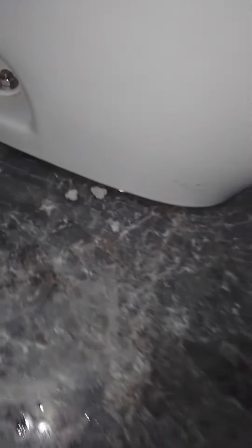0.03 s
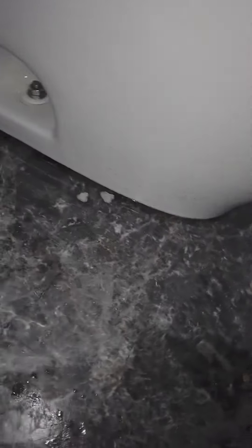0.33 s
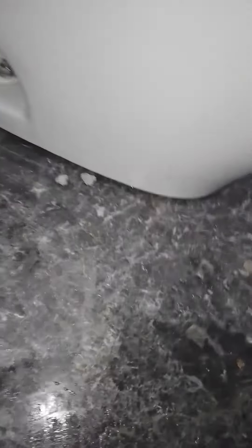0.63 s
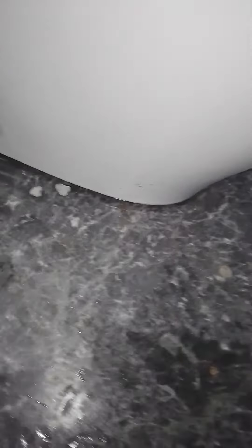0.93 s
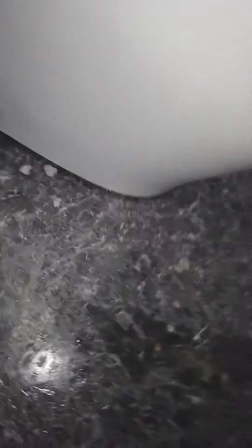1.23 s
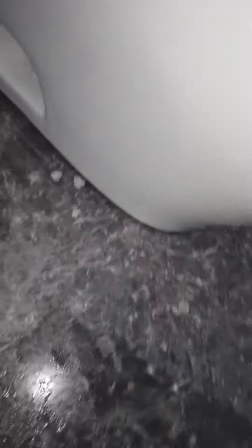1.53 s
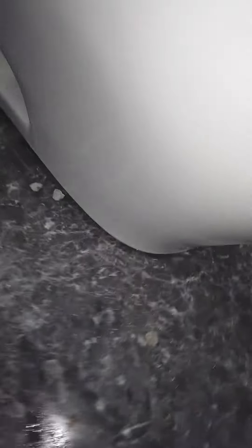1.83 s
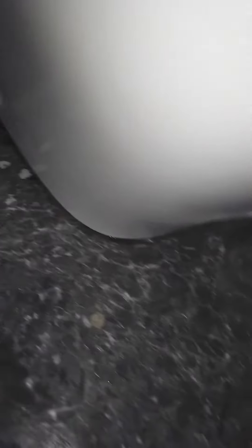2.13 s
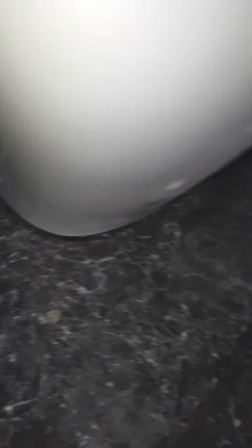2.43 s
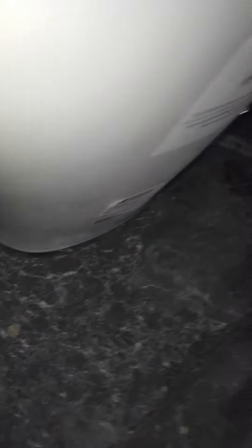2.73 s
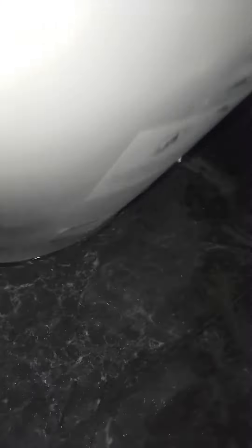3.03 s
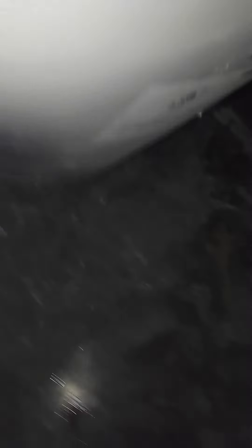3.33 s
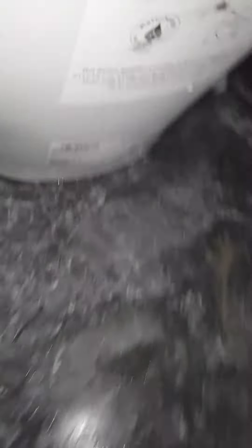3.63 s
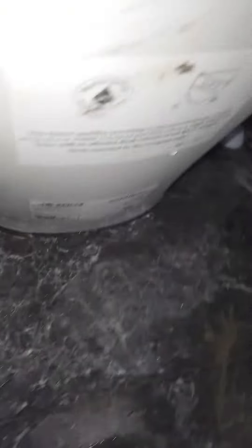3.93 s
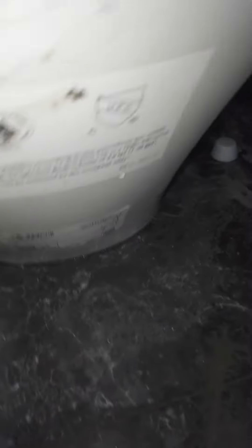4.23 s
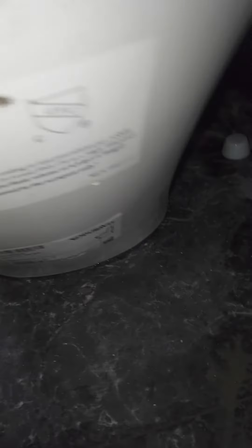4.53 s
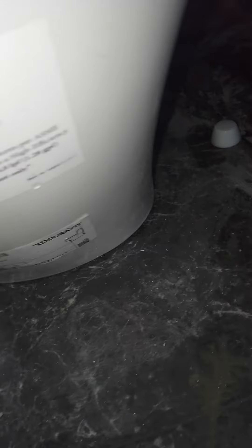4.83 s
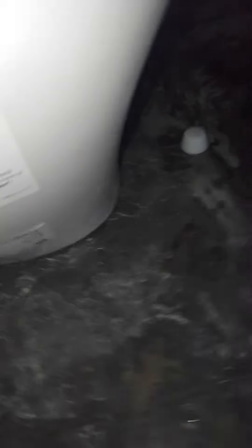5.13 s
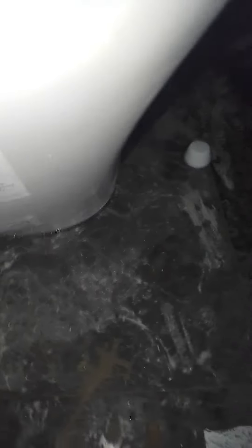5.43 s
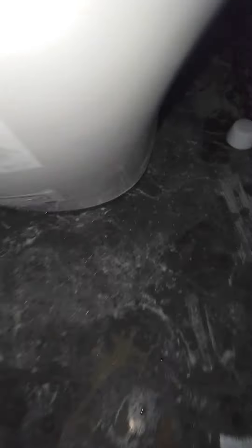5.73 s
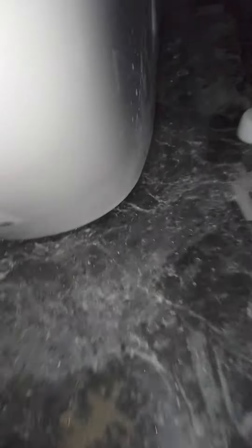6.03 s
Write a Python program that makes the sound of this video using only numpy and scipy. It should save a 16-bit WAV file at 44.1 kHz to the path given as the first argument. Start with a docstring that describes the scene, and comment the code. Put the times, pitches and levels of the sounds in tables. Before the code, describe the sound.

Water sprays and spatters in uneven surges on a tiled floor around a toilet, with ticking drops, plops and light gurgling.

```python
"""A small tiled room, one microphone close to the floor, where water spatters around the base of a toilet.
It opens on a thin fizz of spray and single ticking drops; before the first second is out, something hard
rings twice. Then the flow comes in uneven surges: gushes slap down, bigger drops patter or plop, and the
pooled water sloshes and gurgles. A sharp gush lands near 3.5 s, the flow thins, and the hardest plops
follow after 5.5 s. The room hums faintly throughout."""
import sys
import numpy as np
from scipy import signal
from scipy.fft import rfft, irfft
from scipy.io import wavfile
from scipy.ndimage import uniform_filter1d

SR = 44100
rng = np.random.default_rng(int(sys.argv[2]) if len(sys.argv) > 2 else 0)


def bounce(signal):
    """Save signal as a 16-bit WAV file at the path given by the first command-line argument."""
    frames = np.transpose(np.atleast_2d(signal))
    limited = np.clip(frames, -1, 1)
    pcm = np.round(limited * 32767).astype(np.int16)
    wavfile.write(sys.argv[1], SR, pcm)


N = 269003
TIME = np.arange(N) / SR

# The spray sounds higher when it is finer. Each row: time in seconds, pitch in Hz.
SPRAY_PITCH = [(0.0, 10300), (0.56, 10000), (0.9, 9200), (1.14, 10800), (1.26, 9700), (1.72, 10600),
               (3.06, 9530), (3.75, 11300), (4.11, 9650), (4.3, 10430), (4.38, 8900), (4.91, 10300),
               (4.97, 12000), (5.05, 11700), (5.1, 9800), (5.76, 11200), (5.83, 10100), (6.1, 9640)]


def running_water():
    """The uneven flow on the floor; lone droplets crackle out of it, most plainly when it is thin."""
    spray_db, patter_db, slosh_db, slosh_hz = flow()
    thinness = from_db(-.15 * np.maximum(spray_db + 50, 0))
    crackle = thinness * impacts(per_s=240, spread_db=3.6, clump_db=1.0)
    fine = impacts(per_s=9000, spread_db=1.9, clump_db=1.7) + from_db(-7) * crackle
    coarse = impacts(per_s=8000, spread_db=2, clump_db=1.57) + from_db(-16.5) * crackle
    deep = impacts(per_s=3000, spread_db=3, clump_db=1.0)
    spray_hz = np.interp(TIME, *np.transpose(SPRAY_PITCH))
    return water([fine, coarse, deep], spray_hz, spray_db, patter_db, slosh_db, slosh_hz)


def flow():
    """Stream and surges add in power: spray, patter and slosh in dB, then the puddle's pitch in Hz."""
    # The stream under the surges. Each row: time in seconds, then spray, patter and slosh in dB before trim.
    stream = [(0.0, -45, -59, -61), (0.32, -40, -46, -55.5), (0.8, -44.5, -54, -63.5),
              (1.6, -32.5, -41, -45), (1.75, -28.5, -37, -35.5), (1.88, -31.5, -42, -41.5),
              (2.6, -46.5, -65.5, -59), (2.85, -53, -71, -63.5), (2.99, -71, -60, -79),
              (3.36, -33.5, -49, -67), (3.57, -51, -45, -59), (3.87, -27, -39, -36),
              (4.2, -52.5, -87, -68.5), (4.91, -58.5, -91, -59), (5.06, -53, -45, -61),
              (5.43, -57, -57, -58.5), (5.54, -37, -53, -55), (5.71, -48, -52, -55), (6.1, -34, -36, -60)]
    # Each row: start, rise and hold in seconds, spray, patter and slosh in dB, slosh pitch in Hz.
    surges = [(0.08, 0.057, 0.017, -41.5, -43.5, -56, 1500), (0.25, 0.087, .01, -38.5, -41, -65, 1500),
              (0.712, 0.003, 0.043, -36.5, -47.5, -41.5, 1060), (1.076, 0.021, 0.081, -43, -41, -46.5, 580),
              (1.541, 0.037, .015, -30, -50, -48, 1410), (1.67, 0.026, 0.089, -45, -56, -42, 1280),
              (1.937, 0.082, 0.06, -33, -43, -49.5, 980), (2.323, 0.023, 0.059, -41, -45, -49.5, 1590),
              (2.785, 0.074, 0.015, -45.5, -59, -44.5, 1240), (2.895, 0.11, 0.027, -31.5, -37, -50, 680),
              (3.47, 0.03, 0.065, -39, -39.5, -47, 580), (3.573, 0.091, 0.089, -32.5, -39, -62, 600),
              (3.774, 0.17, 0.032, -33.5, -43.5, -58, 1240), (3.995, 0.031, 0.0086, -39, -41.5, -50, 830),
              (4.362, 0.035, .005, -42.5, -53, -62, 1300), (4.416, 0.034, 0.091, -47.5, -48.5, -50.5, 1270),
              (4.784, 0.034, 0.043, -58, -77, -46, 950), (4.828, 0.052, 0.023, -45, -62, -43, 1380),
              (4.916, 0.06, 0.07, -35.5, -49.5, -58, 1200), (5.116, 0.034, 0.036, -36, -38.5, -47.5, 1430),
              (5.502, 0.041, 0.015, -40, -38, -38.5, 846), (5.838, 0.041, 0.19, -30, -33.5, -44.5, 714)]
    trims_db, puddle_hz = (-7, -2, -4), 1140
    times, *stream_db = np.transpose(stream)
    power = np.array([from_db(np.interp(TIME, times, db) + trim) ** 2
                      for db, trim in zip(stream_db, trims_db)])
    weighted_hz = puddle_hz * power[2]   # the strongest slosh has most say in the pitch
    for start, rise, hold, *levels_db, slosh_hz in surges:
        span = slice(int(start * SR), int(start * SR) + SR)
        swell = envelope(TIME[span] - start, rise, hold, t60=0.43)
        surge_power = np.outer(from_db(levels_db), swell) ** 2
        power[:, span] += surge_power
        weighted_hz[span] += slosh_hz * surge_power[2]
    return (*(10 * np.log10(power)), weighted_hz / power[2])


def water(rain, spray_hz, spray_db, patter_db, slosh_db, slosh_hz):
    """Three streams of impacts sound as fine spray, patter on the tile and slosh in the puddle."""
    # Each row of these two: multiple of the pitch, relative level in dB.
    spray_spectrum = [(.125, -63), (.5, -31), (.75, -6.5), (.92, 1.1), (1.08, 2), (1.28, -3.5), (1.75, -15)]
    slosh_spectrum = [(.25, -48), (.5, -14.5), (.71, -9), (.95, -3), (1.5, 1), (2.83, -6.5), (5, -14.5),
                      (16, -61)]
    # Each row: frequency in Hz, relative level in dB.
    patter_spectrum = [(100, -5), (600, -28), (1500, -5), (3300, -2), (5200, 1.5), (6500, -0.5),
                       (10000, -6.5), (16000, -11.5)]
    fine, coarse, deep = rain
    spray = from_db(spray_db) * colour(fine, spray_spectrum, spray_hz)
    patter = from_db(patter_db) * colour(coarse, patter_spectrum)
    slosh = from_db(slosh_db) * colour(deep, slosh_spectrum, slosh_hz)
    return spray + patter + slosh


def impacts(per_s, spread_db, clump_db):
    """Droplets land at random, in clumps, some bigger than the rest; rms 1."""
    sizes = from_db(spread_db * np.minimum(rng.exponential(1, N), 4)) * rng.choice([-1, 1], N)
    lands = rng.random(N) < per_s / SR
    return rms_one(lands * sizes * from_db(clump_db * drift(per_s=150)))


def gushes():
    """Each gush slaps down as a dense burst of impacts that swells, holds and dies away."""
    # Each row: start, rise and hold in seconds, spray, patter and slosh in dB, slosh pitch in Hz.
    bursts = [(0.069, 0.0041, 0.039, -38.5, -50, -62, 900),
              (1.098, 0.021, 0.0046, -31.5, -30.5, -39.5, 1040),
              (1.133, 0.0088, 0.027, -28.5, -39, -46, 785), (1.266, 0.0027, 0.015, -36.5, -49, -55, 610),
              (1.319, 0.0013, 0.017, -30.5, -33, -46.5, 700), (1.569, 0.014, 0.011, -29, -33, -34, 1480),
              (1.57, 0.059, 0.023, -47, -37, -33, 1270), (2.343, 0.0033, 0.012, -33, -39.5, -51, 1840),
              (2.999, 0.0032, 0.0037, -41, -30, -38.5, 553), (3.325, 0.0034, 0.018, -31, -39.5, -70, 940),
              (3.348, 0.0087, 0.025, -31, -35.5, -45, 706), (3.467, .001, 0.029, -23, -24, -35.5, 620),
              (3.474, 0.0077, 0.0076, -13.5, -23, -34, 636), (4.363, .002, 0.0092, -50, -52, -52, 1600),
              (4.411, 0.0097, 0.002, -30.5, -42, -60, 1286),
              (4.456, 0.0077, 0.042, -30.5, -42.5, -56.5, 880), (4.671, .002, 0.001, -51, -56, -41, 1140),
              (5.05, 0.006, 0.015, -37.5, -38, -72, 935), (5.254, 0.0027, 0.031, -45, -43, -45.5, 585),
              (5.289, 0.0045, 0.012, -31.5, -36.5, -49, 647), (5.519, 0.0029, .01, -32.5, -47, -48, 1100),
              (5.549, 0.0048, .001, -29, -36, -24.5, 1690), (5.563, .003, 0.029, -29, -33.5, -37, 623),
              (5.685, 0.00086, 0.0033, -23, -29, -27.5, 650), (5.689, 0.0022, 0.02, -15, -25, -32.5, 800),
              (5.735, 0.0033, 0.036, -37, -44, -40.5, 764), (5.831, 0.0069, 0.037, -34, -58, -53, 800)]
    out = np.zeros(N)
    rain = np.array([impacts(per_s=20000, spread_db=2.1, clump_db=2.0) for _ in range(3)])
    for start, rise, hold, spray_db, patter_db, slosh_db, slosh_hz in bursts:
        span = slice(int(start * SR), int(start * SR) + SR // 4)
        swell = envelope(TIME[span] - start, rise, hold, t60=0.071)
        stream_hz = np.interp(start, *np.transpose(SPRAY_PITCH))
        spray_hz = 0.98 * stream_hz - (spray_db + 32)   # just below the stream; 1 Hz lower per dB louder
        offset = rng.integers(N - len(swell))
        patch = rain[:, offset:offset + len(swell)]
        out[span] += swell * water(patch, spray_hz, spray_db, patter_db, slosh_db, slosh_hz)
    return out


def ripple(x):
    """As the water film changes shape, narrow resonances form and fade at random."""
    # How far a band is lifted or hollowed. Each row: frequency in Hz, depth in dB.
    depths = [(400, 2.5), (1500, 3), (4000, 2.8), (8000, 2.8), (15000, 2)]
    hz, _, frames = signal.stft(x, SR, nperseg=512)
    patches = rng.standard_normal(frames.shape)
    for _ in range(2):
        patches = uniform_filter1d(patches, size=3, axis=0)   # across frequency
        patches = uniform_filter1d(patches, size=9, axis=1)   # across time
    depth_db = np.interp(hz, *np.transpose(depths))[:, None]
    gain = from_db(depth_db * np.clip(rms_one(patches), -2, 2))
    gain /= np.sqrt(uniform_filter1d(gain ** 2, size=19, axis=0))   # energy only moves to nearby bands
    return signal.istft(frames * gain, SR)[1][:N]


def drops():
    """A drop cracks on the tile and throws tiny satellites; each drop ticks at its own pitch."""
    # Each row: start in seconds, sharp edge and body in dB before trim, edge pitch in Hz.
    ticks = [(0.2864, -34, -27, 10800), (0.513, -25.5, -23, 11500), (.8635, -37, -46, 8300),
             (0.9875, -34, -50, 9800), (1.1145, -29, -36, 11000), (1.148, -27, -44, 10500),
             (1.157, -26, -44, 9800), (1.2558, -30.5, -52, 10500), (1.5023, -24, -56, 10000),
             (1.5183, -22, -45, 9800), (1.5325, -42, -35, 10000), (1.562, -31, -52, 11500),
             (1.601, -26, -36, 11500), (1.672, -31, -38, 10500), (1.7575, -27, -46, 12000),
             (1.884, -25, -48, 11800), (1.887, -34, -52, 12500), (1.998, -30, -50, 9800),
             (2.0473, -19.5, -25.5, 9400), (2.108, -34, -46, 10200), (2.192, -38, -52, 10500),
             (2.249, -39, -64, 10050), (2.2703, -39, -62, 10000), (2.347, -24, -62, 10000),
             (2.699, -35, -58, 10000), (2.859, -34, -44, 11500), (2.863, -33, -46, 9500),
             (2.884, -33, -50, 11400), (2.931, -29, -44, 9400), (2.941, -31, -48, 8500),
             (3.0048, -22, -22, 11500), (3.0062, -22, -28, 9500), (3.1029, -46, -30, 8000),
             (3.123, -42, -35, 11000), (3.274, -37, -64, 7950), (3.3796, -22, -26, 10000),
             (3.4297, -36, -58, 10000), (3.551, -24.5, -42, 10400), (3.6167, -29, -50, 11500),
             (3.677, -36, -35, 10000), (3.694, -32, -31, 10500), (3.787, -28, -48, 11500),
             (3.816, -34, -36, 10900), (3.926, -27, -35, 10000), (4.061, -28, -45, 10000),
             (4.086, -26, -36, 9400), (4.1484, -33, -60, 9000), (4.456, -29, -37, 9000),
             (4.485, -22, -36, 8800), (4.553, -31.5, -55, 9500), (5.058, -24, -51, 11500),
             (5.7775, -31, -34, 10000), (5.7921, -31, -46, 9950), (5.84, -33, -50, 10400)]
    # Each row: multiple of the edge pitch, relative level in dB, t60 in seconds.
    edge_modes = [(.76, -13, 0.0035), (1, -0.5, 0.0022), (1.14, -11, 0.0023)]
    # Each row: frequency in Hz, relative level in dB, t60 in seconds.
    body_modes = [(2200, -9, 0.002), (4100, -3, 0.0023), (6400, -12, 0.0018)]
    edge_trim_db, body_trim_db = 7.5, 12.5
    out = np.zeros(N)
    age = TIME[:SR // 20]
    for start, edge_db, body_db, edge_hz in ticks:
        hit = .05 * rng.standard_normal(len(age)) * np.exp(-age / .0022)   # the satellites
        hit[0] = 1   # the drop itself
        hit = signal.lfilter([1, -.85], [1], hit)   # thins the bass so the tick sounds crisp
        edge = sum(from_db(db) * ring(hit, multiple * edge_hz, t60) for multiple, db, t60 in edge_modes)
        body = sum(from_db(db) * ring(hit, hz, t60) for hz, db, t60 in body_modes)
        span = slice(int(start * SR), int(start * SR) + len(age))
        out[span] += from_db(edge_db + edge_trim_db) * edge + from_db(body_db + body_trim_db) * body
    return out


def plops():
    """A fat drop smacks the puddle with a short crack and opens a cavity that rings for a few cycles."""
    # Each row: start in seconds, crack and cavity in dB, cavity pitch in Hz, cavity t60 in seconds.
    fat_drops = [(1.4152, -21.5, -32, 327, 0.056), (1.4174, -26, -29.5, 736, 0.0087),
                 (1.7915, -32, -37, 1150, 0.014), (3.005, -19, -25, 760, 0.011),
                 (3.3562, -42, -26.5, 1030, 0.014), (3.4676, -14, -29, 520, 0.0097),
                 (3.483, -30, -28, 600, 0.013), (4.6735, -47, -49, 1030, 0.012),
                 (4.8, -40, -37, 600, 0.017), (4.858, -47, -33, 1890, 0.017),
                 (4.913, -32, -33, 1030, 0.017), (5.255, -29, -34.5, 402, 0.045),
                 (5.521, -20, -38, 1300, 0.0093), (5.527, -17, -32, 1260, .013),
                 (5.5325, -16, -27, 1260, 0.014), (5.5525, -16, -47, 1400, 0.0057),
                 (5.5575, -10, -8, 1220, 0.01), (5.6868, -11, -15, 1130, 0.0092)]
    # Each row: frequency in Hz, relative level in dB, t60 in seconds.
    crack_modes = [(1780, -16, 0.0073), (3320, -9, 0.0037), (4360, -11, 0.0026)]
    cracks, cavities = np.zeros(N), np.zeros(N)
    click = signal.unit_impulse(SR // 8)
    for start, crack_db, cavity_db, hz, t60 in fat_drops:
        at = int(start * SR)
        cracks[at] = from_db(crack_db)
        push = signal.lfilter(*signal.butter(1, hz / 2, "high", fs=SR), click)
        cavities[at:at + len(push)] += from_db(cavity_db) * ring(push, hz, t60)
    return cavities + sum(from_db(db) * ring(cracks, hz, t60) for hz, db, t60 in crack_modes)


def gurgles():
    """An air pocket in the sloshing water rings for a moment; its pitch glides as it changes size."""
    # Each row: middle and half-length in seconds, first pitch, last pitch and width in Hz, level in dB.
    pockets = [(.22, 0.17, 1596, 1600, 302, -57.5), (0.45, 0.25, 1325, 1365, 60, -63),
               (0.589, 0.16, 1730, 1725, 70, -59.5), (0.988, 0.11, 1358, 1375, 220, -57.5),
               (1.611, 0.042, 1248, 1200, 350, -39), (1.644, 0.0158, 377, 377, 200, -45.5),
               (1.713, 0.026, 1210, 754, 130, -34), (1.743, 0.076, 1980, 2170, 200, -37.5),
               (1.753, 0.072, 3380, 3600, 330, -38.5), (1.763, 0.063, 1098, 1212, 260, -35),
               (1.812, 0.039, 1246, 1108, 480, -35.5), (1.877, 0.086, 1150, 762, 417, -43.5),
               (2.062, 0.11, 1000, 983, 260, -54), (2.363, .025, 2500, 2450, 350, -44),
               (2.386, 0.056, 1804, 1600, 240, -47.5), (2.58, 0.14, 2550, 2460, 120, -65),
               (2.649, 0.056, 4400, 4400, 70, -68), (2.873, 0.086, 1053, 1110, 219, -46),
               (3.018, 0.047, 630, 632, 200, -48.5), (3.383, 0.078, 1080, 950, 520, -46),
               (3.476, .012, 3255, 3300, 150, -29.5), (3.487, 0.053, 293.6, 302, 120, -49),
               (4.44, .1, 1810, 1700, 220, -56.5), (4.482, 0.04, 4670, 4710, 1410, -37.5),
               (4.866, 0.062, 2240, 2450, 400, -46.5), (4.794, 0.055, 1260, 1374, 130, -49.5),
               (4.839, 0.093, 488, 620, 234, -49.5), (5.195, 0.069, 1370, 1376, 220, -44),
               (5.505, 0.034, 1655, 1650, 400, -53), (5.573, 0.06, 289, 290, 120, -48),
               (5.605, 0.034, 1097, 1250, 500, -42), (5.706, 0.058, 276, 270, 120, -41),
               (5.755, 0.045, 448, 420, 240, -40.5), (5.959, 0.15, 1088, 1191, 400, -51)]
    out = np.zeros(N)
    for middle, half_length, first_hz, last_hz, width_hz, db in pockets:
        span = slice(max(int((middle - half_length) * SR), 0), int((middle + half_length) * SR))
        count = len(out[span])
        lowpass = signal.butter(3, width_hz / 2, fs=SR, output="sos")
        drive = signal.sosfilt(lowpass, rng.standard_normal((2, SR)))[:, -count:]
        phase = 2 * np.pi * np.cumsum(np.geomspace(first_hz, last_hz, count)) / SR
        tone = drive[0] * np.cos(phase) + drive[1] * np.sin(phase)
        swell = np.hanning(count)
        out[span] += from_db(db) * rms_one(tone * swell) * np.sqrt(np.mean(swell ** 2))
    return out


def knocks():
    """A hard body rings: the place of contact picks the modes, and brief chatter roughens them."""
    # Each row: start in seconds, level in dB, place of contact from 0 (first spot) to 1 (second spot).
    blows = [(0.716, -43, 0.081), (0.721, -27.5, 0.047), (0.864, -29.5, 0.78)]
    # Each row: frequency in Hz, level in dB struck at the first spot and at the second, t60 in seconds.
    modes = [(1140, -15.5, -35, 0.18), (1328, -22, -27, 0.48), (1615, -9, -40, 0.21), (2240, -18, -32, .25),
             (3594, -9.5, -5, 0.052), (3670, -17, -32, 0.58), (5795, -9, -40, 0.32),
             (5770, -14.5, -35, 0.3), (7970, -4, -11, .06), (8150, -8, -8, 0.06), (8800, -5.5, -20, 0.29),
             (9180, -2, -28, 0.43), (9680, -8, -28, .24), (10000, -14, -30, .35), (10900, -3.5, -30, 0.39),
             (10500, -13, -30, .22), (11700, -4, -35, .19), (12700, -14, -35, .25)]
    chatter_db, chatter_t60_s = -33, .12
    out = np.zeros(N)
    starts, blow_db, place = np.transpose(blows)
    age = TIME[:SR // 5]
    for hz, first_db, second_db, t60 in modes:
        mode_db = np.interp(place, [0, 1], [first_db, second_db])
        strength_db = blow_db + mode_db + rng.normal(0, 1, len(starts))
        onsets = starts + rng.uniform(0, .002, len(starts))
        clicks = np.zeros(N)
        clicks[(onsets * SR).astype(int)] = from_db(strength_db)
        contact = from_db(chatter_db - 60 * age / chatter_t60_s) * rng.standard_normal(len(age))
        contact[0] = 1
        flutter = from_db(4 * drift(per_s=300))
        out += ring(signal.oaconvolve(clicks, contact)[:N], hz, t60) * flutter
    return out


def tone_colour(x):
    """A fixed colouring lifts some narrow bands and dips others."""
    # Each row: centre in Hz, width in Hz, gain in dB.
    bands = [(1050, 135, -2.5), (2155, 350, -2.5), (3216, 28, 3), (4530, 440, 1.45), (5320, 1400, -3.5),
             (6760, 550, 2.5), (9700, 290, 0)]
    for hz, width_hz, db in bands:
        band = signal.lfilter(*signal.iirpeak(hz, hz / width_hz, fs=SR), x)
        x = x + (from_db(db) - 1) * band
    return x


def room(x):
    """Tiled walls return a dense, short tail, duller than the direct sound at the microphone."""
    t60_s, first_echo_s, wall_cut_hz = 0.88, .004, 4400
    age = TIME[:SR // 2]
    tail = rng.standard_normal(len(age)) * from_db(-60 * age / t60_s) * (age > first_echo_s)
    tail /= np.sqrt(np.sum(tail ** 2))
    tail = signal.sosfilt(signal.butter(1, wall_cut_hz, fs=SR, output="sos"), tail)
    return from_db(-11) * signal.fftconvolve(x, tail)[:N]


def hum():
    """Room tone: low noise whose rumble and upper part slowly swell and sink."""
    # Each row: frequency in Hz, relative level in dB.
    spectrum = [(25, -26), (44, -13), (55, 0.5), (85, 4.5), (108, -11.5), (128, -1), (163, -16.5), (198, 0),
                (250, 4.5), (320, 3), (420, -10.5), (800, -16), (3000, -77), (15000, -45)]
    # Each row of these two: time in seconds, gain of the band in dB.
    upper_swell = [(0, -4.5), (.75, 0), (.92, -11), (1.15, 2), (1.4, 2.5), (2.05, 4), (2.4, 5), (3.1, 1.5),
                   (3.9, 5), (4.45, -2.5), (5.0, 3.5), (5.7, 3), (6.1, 1.5)]
    rumble_swell = [(0, 4), (.2, 8), (.45, -2.5), (1.05, -3), (1.22, 3), (1.5, -1.5), (2.3, 3.5), (3.1, -5),
                    (4.8, -2), (5.6, -3.5), (6.1, 2)]
    hz = np.arange(N // 2 + 1) * SR / N
    noise = irfft(rfft(rng.standard_normal(N)) * gain_at(spectrum, hz), N)
    noise = from_db(-55) * rms_one(noise)
    for centre_hz, q, swell in ((289, 1.8, upper_swell), (80, 0.98, rumble_swell)):
        band = signal.lfilter(*signal.iirpeak(centre_hz, q, fs=SR), noise)
        gain = from_db(np.interp(TIME, *np.transpose(swell)))
        noise = noise + (gain - 1) * band
    return noise


def colour(x, spectrum, pitch=1):
    """Give x a spectrum that slides with a pitch (one value or one per sample), keeping its level."""
    hz, times, frames = signal.stft(x, SR, nperseg=512)
    frame_pitch = np.interp(times * SR, np.arange(len(x)), pitch * np.ones(len(x)))
    gain = gain_at(spectrum, hz[:, None] / frame_pitch)
    gain /= np.sqrt(np.mean(gain ** 2, axis=0))
    return signal.istft(frames * gain, SR)[1][:len(x)]


def ring(clicks, hz, t60):
    """A unit click sets a sine of height 1 ringing down."""
    decay, step = from_db(-60 / (t60 * SR)), 2 * np.pi * hz / SR
    return signal.lfilter([0, np.sin(step)], [1, -2 * decay * np.cos(step), decay ** 2], clicks + 1e-18)


def envelope(age, rise, hold, t60):
    """Swell, hold, then die away; all times in seconds."""
    return np.clip(age / rise, 0, 1) * from_db(-60 * np.maximum(age - rise - hold, 0) / t60)


def drift(per_s):
    """Smooth random wandering of spread 1."""
    steps = rng.standard_normal(8000)
    return rms_one(np.interp(TIME * per_s, np.arange(len(steps)), steps))


def gain_at(spectrum, hz):
    """Read a spectrum on a log-frequency axis."""
    points, db = np.transpose(spectrum)
    return from_db(np.interp(np.log(hz + 1e-6), np.log(points), db))


def from_db(db):
    """Decibels to gain."""
    return 10 ** (np.asarray(db) / 20)


def rms_one(x):
    """Scale to unit rms."""
    return x / np.sqrt(np.mean(x ** 2) + 1e-20)


def scene():
    """Water and knocks close to the microphone, the walls and the hum behind; mono."""
    spatter = ripple(running_water() + gushes())
    near = tone_colour(spatter + gurgles() + drops() + plops() + knocks())
    low_cut = signal.butter(4, 210, "high", fs=SR, output="sos")   # a thin water film radiates no bass
    near = signal.sosfilt(low_cut, near)
    return (near + room(near) + hum())[None]


def record(dry):
    """The top is cut steeply above 15.9 kHz."""
    return signal.sosfilt(signal.ellip(12, .1, 80, 15900, fs=SR, output="sos"), dry)


dry = scene()
out = record(dry)
bounce(out)
```